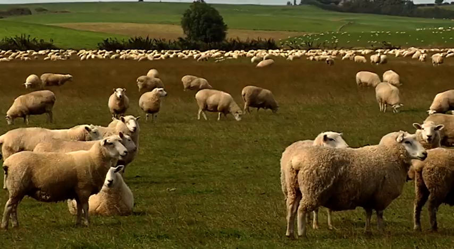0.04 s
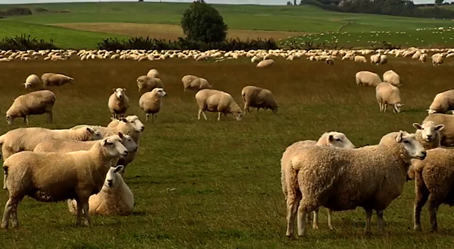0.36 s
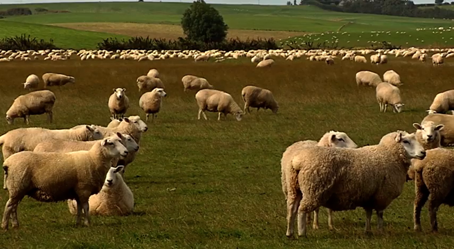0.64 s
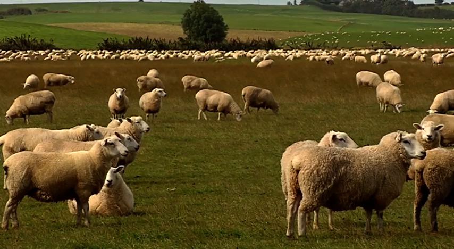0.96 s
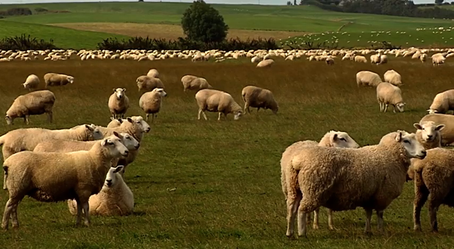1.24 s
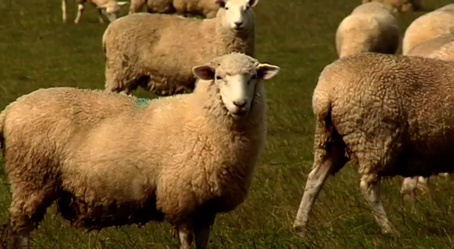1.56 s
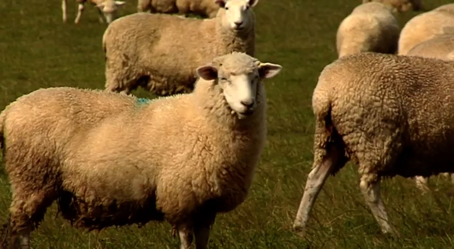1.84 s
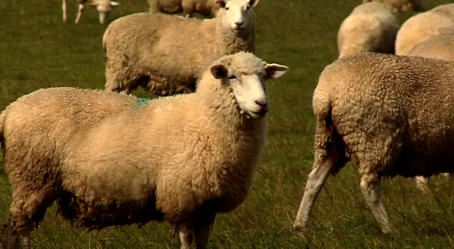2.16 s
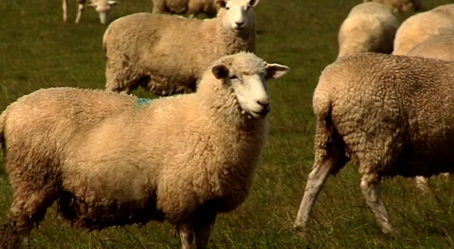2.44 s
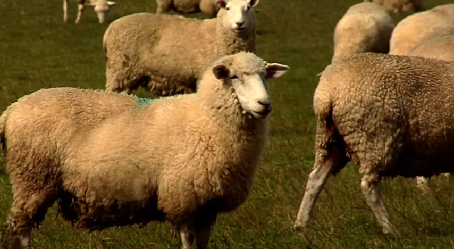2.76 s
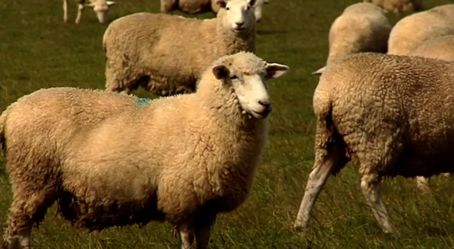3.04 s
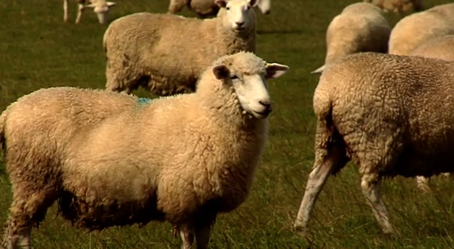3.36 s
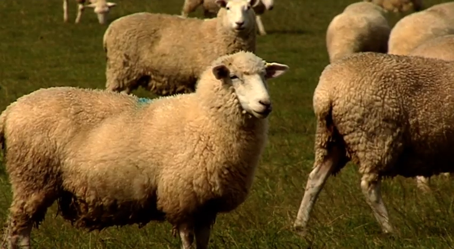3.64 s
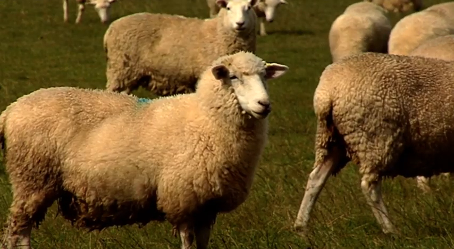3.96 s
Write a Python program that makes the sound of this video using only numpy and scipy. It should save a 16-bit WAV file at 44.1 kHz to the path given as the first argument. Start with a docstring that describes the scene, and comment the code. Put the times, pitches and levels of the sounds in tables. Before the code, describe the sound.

Sheep bleat faintly in a pasture, slightly left, while gusty wind rumbles on the microphone throughout. A distant bleat rises from about 1.2 seconds and breaks off at 1.6 with a tiny click. The wind eases as a steady nasal bleat follows, sagging by 2.2 seconds. Gusts return around 2.5 seconds, and a low, hoarse, quavering bleat runs from 3.4 to 4 seconds.

```python
"""Gusts of wind rumble on a microphone in a pasture, and then three sheep call, all a little to the left.
A far sheep gives a rising bleat. The scene cuts with a tiny click to a calmer spot, where a second
holds a steady, nasal note that sags at its end. A third answers in a low, rattling quaver.
Each bleat is a buzz from the sheep's vocal folds, shaped by its throat and mouth."""
import sys
import numpy as np
from scipy import signal
from scipy.fft import rfft, irfft, next_fast_len
from scipy.io import wavfile
from scipy.ndimage import map_coordinates

SR = 44100
rng = np.random.default_rng(int(sys.argv[2]) if len(sys.argv) > 2 else 0)


def put_to_file(sound):
    """Save the sound as 16-bit audio at rate SR, in the file named by the first command-line argument."""
    columns = np.atleast_2d(sound).T  # one column per channel
    safe = np.clip(columns, -1, 1)
    whole_steps = np.round(safe * 32767)
    wavfile.write(sys.argv[1], SR, whole_steps.astype(np.int16))


N = 176400
CUT_S = 1.63  # when the scene moves to the calmer spot


def far_bleat():
    """A call that swells and climbs as the mouth opens, then breaks off at the cut."""
    # the course of the call: time_s, pitch_hz, level_db
    call = [(1.22, 191.3, -70), (1.26, 192.3, -60.5), (1.298, 196.9, -51), (1.338, 199.2, -52),
            (1.366, 210.4, -51.5), (1.418, 212.5, -50.5), (1.448, 221.7, -48), (1.498, 220.3, -50),
            (1.526, 223.6, -48), (1.57, 221.9, -52.5), (1.63, 226, -50.5)]
    # the throat's tone while the mouth opens, and once it is open: frequency_hz, gain_db
    opening_tone = [(200, -45), (1100, -33), (1350, 1), (1500, 6), (1700, -2), (1950, 3), (2150, -9),
                    (2700, -14.5), (7000, -63)]
    open_tone = [(200, -37), (1100, -26), (1330, -6), (1530, 4.5), (1780, -4.5), (2010, 4.5), (2230, -1.5),
                 (2450, -5.5), (2700, -25), (7000, -62)]
    pitch_hz, level_db = curves(call)
    buzz = vocal_folds(pitch_hz, jitter=0.0062, scatter_db=0.1, breath=0.14)
    opened = glide(start_s=1.42, end_s=1.51)
    voice = (1 - opened) * shaped(buzz, opening_tone) + opened * shaped(buzz, open_tone)
    return voice * amp(level_db) * gate(call[0][0], CUT_S)


def nasal_bleat():
    """A barely wavering note that starts bright, thins out, then sags and grows hoarse."""
    # the course of the call: time_s, pitch_hz, throat_db, treble_db, vowel_db
    call = [(1.63, 187, -59, -56, -63), (1.72, 187, -59, -60.5, -62), (1.8, 186.2, -62.5, -66.5, -64),
            (1.9, 186.9, -62, -78, -68), (1.97, 187.3, -66.5, -71, -61.5), (2.061, 185.7, -64, -68, -64),
            (2.149, 180, -61.5, -70, -62), (2.195, 173, -62, -67.5, -71), (2.24, 170, -77, -88, -90)]
    # the tone of the throat, its bright top and its lower vowel ring: frequency_hz, gain_db
    throat_tone = [(200, -29), (1100, -18), (1310, -6), (1680, 0), (1860, 5), (2050, 8), (2240, 5.5),
                   (2620, 3.5), (3000, -17), (4000, -17), (7000, -45)]
    treble_tone = [(200, -60), (2500, -20), (3300, -4), (3850, 0), (4400, -2.5), (5000, -8.5), (5500, -17),
                   (8000, -38)]
    vowel_tone = [(200, -34), (1100, -20), (1310, -14.5), (1480, -6.5), (1700, -18), (5000, -58)]
    pitch_hz, throat_db, treble_db, vowel_db = curves(call)
    waver = 1 + 0.002 * wobble(20)
    hoarseness = glide(start_s=1.93, end_s=2.21, before=0.002, after=0.009)
    buzz = vocal_folds(pitch_hz * waver, jitter=hoarseness, scatter_db=1.0, breath=0.22)
    buzz = nose_hollow(buzz)
    throat = shaped(buzz, throat_tone) * amp(throat_db)
    treble = shaped(buzz, treble_tone) * amp(treble_db)
    vowel = shaped(buzz, vowel_tone) * amp(vowel_db)
    return (throat + treble + vowel) * gate(CUT_S, call[-1][0])


def quavering_bleat():
    """A creak turns into hoarse shakes over a dull rasp; the mouth narrows and rings lower."""
    # one row for each shake of the voice: start_s, length_s, level_db
    shake_rows = [(3.43, 0.02, -62.5), (3.521, 0.017, -58.5), (3.601, 0.04, -60.5), (3.657, 0.025, -60.5),
                  (3.701, 0.042, -62), (3.778, .04, -61.3), (3.855, .04, -61.8), (3.939, 0.041, -62.5)]
    # the held voice under the shakes: time_s, level_db
    held_levels = [(3.38, -76), (3.51, -58.5), (3.59, -56.5), (3.74, -58), (3.9, -61), (4, -64)]
    # the tone of the throat and of the mouth: frequency_hz, gain_db
    throat_tone = [(150, -10), (560, -11), (635, -2), (695, 3), (770, -3.5), (1300, -17), (3000, -45)]
    mouth_tone = [(200, -34), (1000, -2), (1800, -5), (2150, 3.5), (2360, 7), (2600, -1.5), (2950, -3),
                  (3450, -21), (4850, -11), (5500, -27), (9000, -53)]
    pitch_hz = 157.8 * (1 + 0.03 * wobble(20))
    creak = glide(start_s=3.53, end_s=3.6, before=0.7, after=0.16)
    buzz = vocal_folds(pitch_hz, jitter=0.0448, scatter_db=0.4, breath=0.35, creak=creak)
    buzz += 0.35 * rng.standard_normal(N)  # air leaks through the folds
    held_db, = curves(held_levels)
    held = amp(held_db) * gate(held_levels[0][0], held_levels[-1][0])
    shakes = sum(amp(level_db) * gate(start_s, start_s + length_s, rise_s=0.012, fall_s=0.0049)
                 for start_s, length_s, level_db in shake_rows)
    throat = unit(shaped(buzz, throat_tone) + noise(throat_tone))
    narrowed = glide(start_s=3.61, end_s=3.82)
    narrow_tone = [(hz * 0.953, db) for hz, db in mouth_tone]
    mouth = (1 - narrowed) * shaped(buzz, mouth_tone) + narrowed * shaped(buzz, narrow_tone)
    return throat * held + mouth * (shakes + amp(-11) * held)


def vocal_folds(pitch_hz, jitter, scatter_db, breath, creak=0):
    """The folds snap shut once a cycle, making a pulse and a puff of breath.
    jitter makes the timing uneven, scatter_db the size; creak weakens every other pulse."""
    cycles = np.cumsum(pitch_hz * (1 + jitter * wobble(150))) / SR
    pulse_at = np.interp(np.arange(1, int(cycles[-1])), cycles, np.arange(N))
    # a pulse falls between samples, so spread it over its neighbours
    nearby = pulse_at.astype(int)[:, None] + np.arange(-7, 9)
    offset = nearby - pulse_at[:, None]
    shapes = np.sinc(offset) * np.sinc(offset / 8)
    pulses = unit(np.bincount(np.clip(nearby, 0, N - 1).ravel(), shapes.ravel(), N))
    puffs = unit(rng.standard_normal(N) * np.exp(-4 * (cycles % 1)))
    strong_weak = 1 - creak * np.sin(np.pi * cycles / 2) ** 2
    return (pulses + breath * puffs) * amp(scatter_db * wobble(150)) * strong_weak


def nose_hollow(buzz):
    """The nose cancels a narrow band of the voice; the band climbs and thins the note."""
    # the middle of that band: time_s, frequency_hz
    hollow_path = [(1.75, 1680), (1.91, 1820), (1.96, 2150), (2.12, 2350)]
    depth_db, width_hz = -11, 97
    hz, time_s, spectrum = signal.stft(buzz, SR, nperseg=1024)
    centre_hz = np.interp(time_s, *np.transpose(hollow_path))
    dip = np.exp(-((hz[:, None] - centre_hz) / width_hz) ** 2)
    return signal.istft(spectrum * amp(depth_db * dip))[1][:N]


def wind():
    """Gusts buffet the microphone, air rushes with a low roar, and grass hisses, softer after the cut."""
    # how the gusts and the rushing air rise and fall: time_s, level_db
    gust_levels = [(0, -27.5), (.14, -28.5), (.2, -24.5), (.35, -25), (.62, -27.5), (.92, -27.5),
                   (.98, -23), (1.27, -31), (1.35, -27.5), (1.62, -30.5), (1.67, -41), (1.85, -35.5),
                   (2.25, -32), (2.47, -33.5), (2.56, -24.5), (2.72, -28.5), (3.07, -28), (3.27, -30),
                   (3.36, -32), (3.72, -39), (3.98, -30.5)]
    rush_levels = [(0, -57), (.2, -55), (.45, -56), (1.2, -59.5), (1.62, -59.5), (1.66, -64.5), (2.15, -61),
                   (2.47, -61), (2.56, -57), (2.74, -59.5), (2.87, -56.5), (3.05, -58.5), (3.15, -62),
                   (3.24, -58), (3.3, -64.5), (3.7, -65), (4, -64.5)]
    # the tone of each layer of wind: frequency_hz, gain_db
    rumble_tone = [(20, -13), (45, -11.5), (72, -0.5), (90, 0.5), (130, -1.5), (220, -14), (320, -27.5),
                   (480, -36), (800, -47.5), (2000, -80.5)]
    roar_tone = [(80, -19.5), (160, 4), (220, 0), (330, -8.5), (480, -19.5), (900, -33.5), (2000, -65)]
    air_tone = [(150, 4.5), (450, 4), (800, 1), (1200, -3), (1800, -4.5), (2500, -20.5), (4500, -24.5),
                (9000, -41)]
    grass_tone = [(200, 12.5), (1000, -0.5), (2800, 0.5), (4500, 0.5), (5700, -4.5), (6700, -4),
                  (8500, -8.5), (11500, -18), (16000, -51)]
    gust_db, = curves(gust_levels)
    rush_db, = curves(rush_levels)
    flutter = wobble(30.7)
    rumble = noise(rumble_tone) * amp(gust_db + 0.22 * flutter + 0.7)
    force_db = gust_db + rush_db
    roar_db = -39.5 + 0.69 * (force_db - force_db.mean())
    roar = noise(roar_tone) * amp(roar_db + 0.55 * wobble(35))
    air = noise(air_tone) * amp(rush_db + 0.37 * flutter + 1.57 * wobble(40) + 6)
    grass = noise(grass_tone) * amp(np.where(clock() < CUT_S, -58.5, -62.5))
    return rumble + roar + air + grass


def click():
    """The signal jumps at the cut and falls straight back, making a tiny click."""
    level_db, fade_s = -33, 0.00064
    since_s = clock() - CUT_S
    return amp(level_db) * (since_s >= 0) * np.exp(-np.abs(since_s) / fade_s)


def amp(db):
    """Turn decibels into a multiplier."""
    return 10 ** (np.asarray(db) / 20)


def unit(sound):
    """Scale a sound to an average power of 1."""
    return sound / np.sqrt(np.mean(sound ** 2) + 1e-20)


def clock():
    """Each sample's time in seconds."""
    return np.arange(N) / SR


def curves(rows):
    """One value per sample for each column after the time."""
    time_s, *columns = np.transpose(rows)
    return [np.interp(clock(), time_s, column) for column in columns]


def glide(start_s, end_s, before=0, after=1):
    """Slide evenly from one value to another."""
    return np.interp(clock(), [start_s, end_s], [before, after])


def gate(start_s, end_s, rise_s=0.002, fall_s=0.0022):
    """Fully on from start to end, with a short fade on either side."""
    return np.interp(clock(), [start_s - rise_s, start_s, end_s, end_s + fall_s], [0, 1, 1, 0])


def wobble(rate_hz):
    """A smooth curve through rate_hz random points a second."""
    return map_coordinates(rng.standard_normal(int(N * rate_hz / SR) + 4), [clock() * rate_hz])


def shaped(sound, tone):
    """Filter a sound by (frequency_hz, gain_db) rows, then scale it to a power of 1."""
    size = 2 * next_fast_len(N // 2 + 8192)
    hz, db = np.transpose(tone)
    gain_db = np.interp(np.log(np.fft.rfftfreq(size, 1 / SR) + 1), np.log(hz + 1), db)
    # keep one side of the cepstrum, so the filter rings only after each pulse
    cepstrum = irfft(np.log(amp(gain_db)), size)
    cepstrum[1:size // 2] *= 2
    cepstrum[size // 2 + 1:] = 0
    response = np.exp(rfft(cepstrum))
    return unit(irfft(rfft(sound, size) * response, size)[:N])


def noise(tone):
    """Random noise with the given tone."""
    return shaped(rng.standard_normal(N), tone)


def scene():
    """Mix the wind, sheep and click, a little louder on the left."""
    left_db, right_db = 1.5, -1.5
    pasture = wind() + far_bleat() + nasal_bleat() + quavering_bleat() + click()
    return pasture * amp([[left_db], [right_db]])


def record(dry):
    """The recorder adds faint hiss and drops the very highest treble."""
    hiss_db, top_hz = -75.5, 15750
    size = next_fast_len(N + 8192)
    hissy = dry + amp(hiss_db) * rng.standard_normal(N)
    kept = np.fft.rfftfreq(size, 1 / SR) < top_hz
    return irfft(rfft(hissy, size) * kept, size)[:, :N]


dry = scene()
out = record(dry)
put_to_file(out)
```